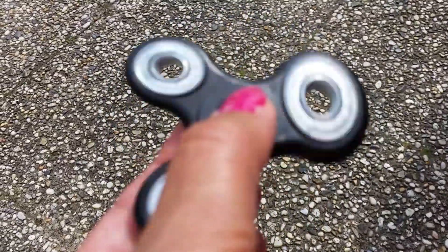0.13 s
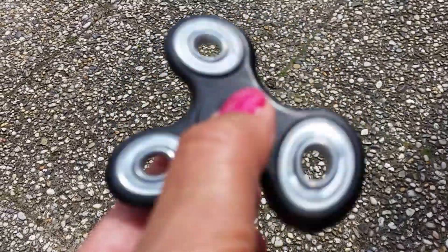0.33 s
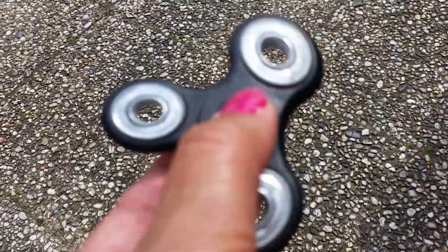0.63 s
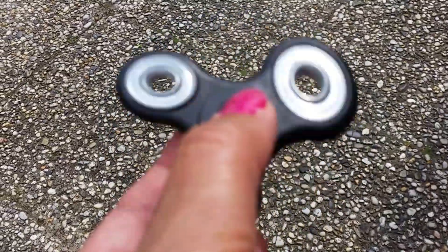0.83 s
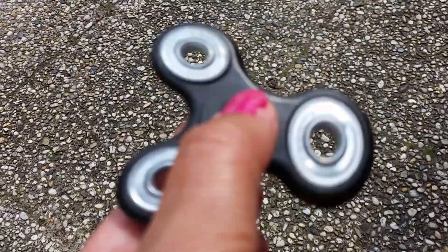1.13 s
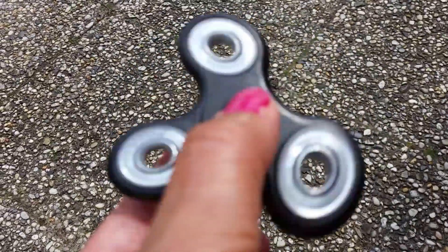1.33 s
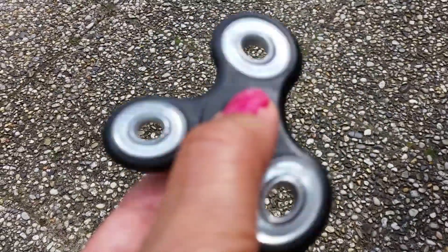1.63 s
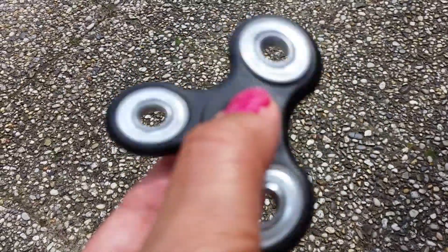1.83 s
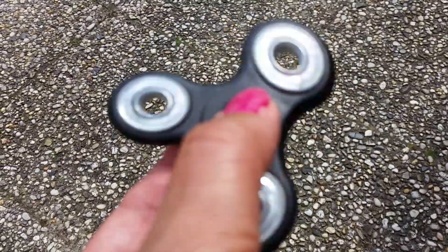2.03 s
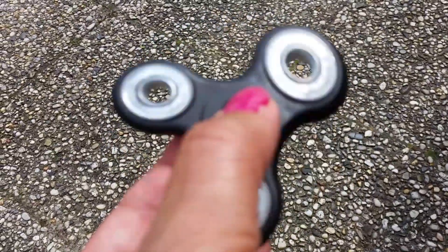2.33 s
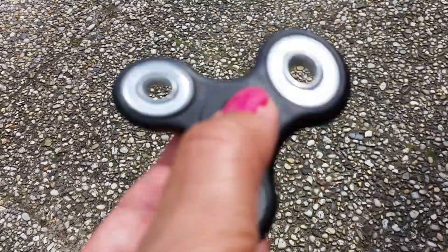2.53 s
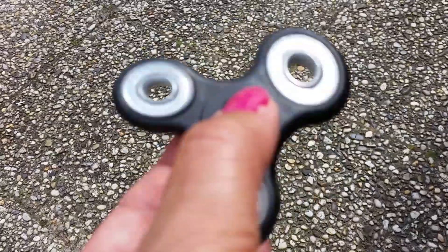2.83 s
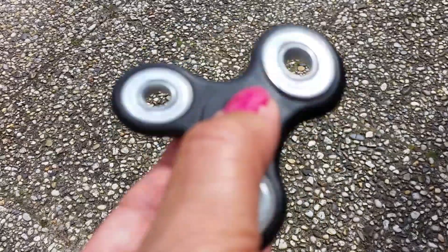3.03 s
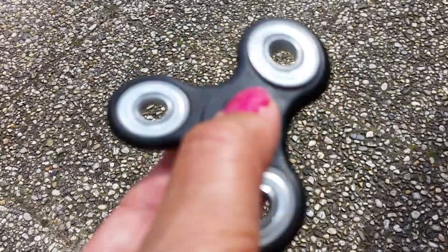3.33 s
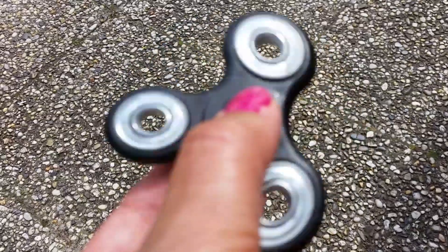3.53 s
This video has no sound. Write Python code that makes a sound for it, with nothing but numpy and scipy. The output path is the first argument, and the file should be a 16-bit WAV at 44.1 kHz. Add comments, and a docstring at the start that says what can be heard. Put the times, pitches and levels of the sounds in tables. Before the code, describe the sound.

A fidget spinner whirs throughout, thin and grainy, with light ticks near the start and at 1.7 seconds. Low machinery hum throbs over distant traffic rumble outdoors. A hand softly bumps the microphone three times between 1.4 and 1.7 seconds, then harder at 3.3. A fine hiss swells around 2.6 seconds, and a far bird chirps faintly at about 3.5.

```python
"""First you hear the narrow, grainy whir of a fidget spinner coasting between finger and thumb outdoors.
Tiny balls roll and rub in its bearing, making the metal ring and now and then tick.
The hand softly bumps the microphone a few times. Nearby machinery hums, its low tones beating
against each other under a thin motor buzz. Behind it all, distant traffic rumbles,
a fine hiss swells once, and a far bird chirps near the end."""
import sys
import numpy as np
from scipy import signal
from scipy.fft import rfft, irfft
from scipy.io import wavfile

SR = 44100
rng = np.random.default_rng(int(sys.argv[2]) if len(sys.argv) > 2 else 0)


def put_to_file(sound):
    """Save the sound as 16-bit audio at rate SR, in the file named by the first command-line argument."""
    columns = np.atleast_2d(sound).T  # one column per channel
    safe = np.clip(columns, -1, 1)
    whole_steps = np.round(safe * 32767)
    wavfile.write(sys.argv[1], SR, whole_steps.astype(np.int16))


N = 161847
T = np.arange(N) / SR
FREQS = np.maximum(np.arange(N // 2 + 1) * SR / N, 1)


CONTACTS_PER_S, CONTACT_SPREAD_DB, RUB_STRENGTH = 6000, 1.5, 0.89
WOBBLE_PER_S, WOBBLE_SWAY_HZ, LOAD_SWAY_HZ = 7.3, 21.5, 22
WHIR_DB, WHIR_BAND_HZ = -60.5, (2660, 4320)
# How the bearing rings: pitch_hz, width_hz, relative_level_db
BEARING_RINGS = [(3548, 404, 20), (3516, 80, 15)]
def bearing_whir():
    """Balls knock and rub, ringing the metal. The pitch sways as the toy wobbles and the load shifts."""
    sizes = from_db(CONTACT_SPREAD_DB * rng.exponential(1, (2, N))) * rng.choice([-1, 1], (2, N))
    contacts = rms_one(sizes * (rng.random((2, N)) < CONTACTS_PER_S / SR))
    force = contacts + RUB_STRENGTH * rng.standard_normal((2, N))
    whir = 0
    for hz, width, db in BEARING_RINGS:
        decay = np.exp(-np.pi * width / SR)  # a narrower ring lasts longer
        feedback = [1, -2 * decay * np.cos(2 * np.pi * hz / SR), decay ** 2]
        whir += from_db(db) * (1 - decay ** 2) * signal.lfilter([1, 0, -1], feedback, force)
    sway_hz = WOBBLE_SWAY_HZ * tone(WOBBLE_PER_S) + LOAD_SWAY_HZ * drift(5)
    # slide the whole whir up and down by sway_hz
    whir = np.real(signal.hilbert(whir) * np.exp(2j * np.pi * np.cumsum(sway_hz) / SR))
    return rms_one(band(whir, WHIR_BAND_HZ)) * from_db(WHIR_DB) * pan(16)


# Each tick: start_s, gain_db, pan_db (left minus right)
TICKS = [(.082, -64, -8), (.346, -51, -10), (1.684, -57, -10)]
# The tones in one tick: pitch_hz, gain_db, fade_s
TICK_RINGS = [(1700, -7, 0.0052), (2570, 0, 0.02), (3740, 4, .008), (5400, -10, 0.0055)]
def bearing_ticks():
    """A few ball contacts stand out as ticks. Each contact is soft, which dulls its treble."""
    ticks = sum(from_db(db) * pan(pan_db) * strike(s, TICK_RINGS) for s, db, pan_db in TICKS)
    return soften(ticks, corner_hz=4400)


# Each bump: start_s, gain_db
BUMPS = [(1.371, -31.5), (1.533, -36), (1.682, -34.5), (3.28, -24.5)]
# The tones in one bump: pitch_hz, gain_db, fade_s
BUMP_RINGS = [(140, -3.5, 0.011), (217, -6, 0.015), (436, -13, 0.01)]
def hand_bumps():
    """The hand knocks the microphone: short, round thuds with no deep bass or treble."""
    bumps = sum(from_db(db) * strike(s, BUMP_RINGS) for s, db in BUMPS)
    return band(bumps + 1e-18, edges_hz=(61, 470))


FAN_HZ, MAINS_HZ, DRONE_HZ = 119.2, 100.0, 218.55
FAN_TRIM_DB, MAINS_TRIM_DB, DRONE_TRIM_DB, FLUTTER_DB = -0.5, 1.5, -1, 0.5
# How each strong hum rises and falls, before its trim is added: time_s, level_db
FAN_LEVEL = [(0.0, -44), (0.6, -45), (0.8, -42), (1.05, -47.5), (1.2, -45), (1.57, -48.5), (1.72, -43),
             (1.9, -42), (2.2, -48), (2.54, -39), (2.87, -42), (3.15, -46.5), (3.4, -44.5), (3.67, -42)]
MAINS_LEVEL = [(0.0, -69), (0.35, -54), (0.8, -61), (1.08, -72), (1.34, -52), (1.84, -52.5), (2.2, -64),
               (2.38, -55.5), (2.9, -51.5), (3.3, -58), (3.67, -63)]
DRONE_LEVEL = [(0.0, -54.5), (0.59, -64.5), (1.02, -50.5), (1.72, -50), (2.1, -58.5), (3.67, -57.5)]
# Fainter hums: pitch_hz, level_db, pan_db, wander_hz
WEAK_TONES = [(31.2, -68.5, -2, 0.15), (50.16, -68, 7, 0.078), (61.4, -74.5, 21, 0.25),
              (198.8, -65, -4.5, 0.14), (248.2, -66.5, 5, 2.906), (335, -70, -1, 2.94),
              (463.6, -75.5, 2, 3.02)]
def machinery_hum():
    """A fan and the mains power hum at close pitches, so they beat (throb). Other tones join in."""
    hums = [(FAN_HZ, FAN_TRIM_DB, FAN_LEVEL), (MAINS_HZ, MAINS_TRIM_DB, MAINS_LEVEL),
            (DRONE_HZ, DRONE_TRIM_DB, DRONE_LEVEL)]
    strong = sum(from_db(trim_db + FLUTTER_DB * drift(10)) * level(curve) * tone(hz)
                 for hz, trim_db, curve in hums)
    weak = sum(from_db(db) * pan(pan_db) * tone(hz + wander_hz * drift(1.73))
               for hz, db, pan_db, wander_hz in WEAK_TONES)
    return strong * pan(-1.5) + weak


# Overtones of a second hum: pitch_multiple, level_db, pan_db
WAVER_TONES = [(2, -57.5, -2), (3, -63.5, -2)]
# How it fades and returns: time_s, gain_db
WAVER_GAIN = [(0, 1.5), (.8, -1), (1.2, -11.5), (1.8, -7.5), (2.16, -2), (2.7, -7.5), (2.95, 1.5),
              (3.67, 1.5)]
def wavering_hum(wander_hz=0.367):
    """A second hum wavers around two and three times the fan's pitch."""
    pitch = FAN_HZ + wander_hz * drift(2.2)
    hum = sum(from_db(db) * pan(pan_db) * tone(multiple * pitch) for multiple, db, pan_db in WAVER_TONES)
    return level(WAVER_GAIN) * hum


# Overtones of the motor: pitch_multiple, level_db, pan_db
MOTOR_TONES = [(6, -68.5, 9), (7, -81, -18), (9, -82, 10), (10, -82.5, 12), (15, -83.5, 26),
               (16, -80.5, 11), (17, -69.5, -17.5), (19, -75, 0.5), (23, -80, 10.5), (33, -85, 0),
               (30, -84.5, 14), (35, -91, -3), (37, -90, -23)]
def motor_buzz(base_hz=46.755, waver_db=0.76):
    """A motor buzzes thinly: faint tones at whole multiples of one low pitch."""
    return sum(from_db(db + waver_db * drift(3.2)) * pan(pan_db) * tone(multiple * base_hz)
               for multiple, db, pan_db in MOTOR_TONES)


# The low rumble and the tyre noise, from bass to treble: pitch_hz, level_db_per_hz
RUMBLE = [(15, -97), (35, -82), (70, -77), (125, -74), (150, -77), (180, -78), (260, -79), (340, -84),
          (480, -92), (900, -108), (2000, -135)]
TYRES = [(150, -105), (450, -91.5), (850, -88.5), (1300, -94), (2000, -99), (3300, -100), (4500, -106),
         (7000, -122), (9000, -132)]
# How each rises and falls: time_s, gain_db
RUMBLE_GAIN = [(0, 0), (.8, 1.5), (1.3, -1), (2.0, -0.5), (2.7, -2.5), (3.67, 0.5)]
TYRE_GAIN = [(0, -1), (.8, 1.5), (1.1, -3.5), (1.65, -3.5), (2.1, 0), (2.6, 1), (3.25, 1.5), (3.67, 2)]
def distant_traffic():
    """Far traffic makes a low rumble and a soft rush of tyres."""
    return level(RUMBLE_GAIN) * noise(RUMBLE) + level(TYRE_GAIN) * noise(TYRES)


SIZZLE_PEAK_S, SIZZLE_RISE_S, SIZZLE_FALL_S, SIZZLE_DB = 0.65, 0.02, 0.115, -71
# The steady hiss and the swelling hiss: pitch_hz, level_db_per_hz
STEADY_HISS = [(3000, -132), (8500, -129), (10500, -122), (11500, -116.5), (13500, -117), (15700, -113)]
SWELL_HISS = [(900, -108), (2000, -99), (3500, -93), (5500, -101), (7000, -110), (8700, -116),
              (11500, -108), (13500, -111), (15700, -109)]
# Which side the swelling hiss leans to: pitch_hz, pan_db
SWELL_PAN = [(1500, -14), (3500, 0.5), (5500, -10), (8000, -10.5), (11500, -1), (15000, -3)]
# How it rises and falls: time_s, gain_db
SWELL_GAIN = [(0, -10), (.5, -9.5), (.72, -8.5), (1.1, -11.5), (1.7, -12), (2.25, -9), (2.42, -4), (2.6, 0),
              (2.72, 0), (2.95, -2.3), (3.12, -7.5), (3.67, -9.5)]
def fine_hiss(flicker_db=1):
    """Over a faint, steady hiss come a short, very high sizzle and later one flickering swell."""
    steady = noise(STEADY_HISS)
    flicker = from_db(flicker_db * drift(34))
    swell = level(SWELL_GAIN) * flicker * noise(SWELL_HISS, over_hz(SWELL_PAN))
    from_peak_s = T - SIZZLE_PEAK_S
    burst = np.exp(-np.maximum(-from_peak_s / SIZZLE_RISE_S, from_peak_s / SIZZLE_FALL_S))
    sizzle = rms_one(band(rng.standard_normal((2, N)), edges_hz=(13800, 16000)))
    return steady + swell + from_db(SIZZLE_DB) * pan(-7) * burst * sizzle


# Each bird note: peak_s, pitch_hz, level_db, rise_and_fall_s
CHIRPS = [(3.442, 2450, -60.5, 0.012), (3.563, 1770, -67, .012), (3.6, 1800, -65.5, 0.015)]
def far_bird(sag_hz_per_s=201, rasp_hz=75, flutter_db=1.5):
    """Short, nearly level notes, made raspy by a fast flutter in pitch and strength."""
    notes = 0
    for peak_s, hz, db, slope_s in CHIRPS:
        sag_hz = sag_hz_per_s * np.clip(T - peak_s, -slope_s, slope_s)
        pitch = hz - sag_hz + rasp_hz * drift(146)
        shape = np.exp(-abs(T - peak_s) / slope_s)
        notes += from_db(db + flutter_db * drift(200)) * shape * tone(pitch)
    return notes * pan(-10)


# How alike the outdoor noise is on the left and right: pitch_hz, likeness_0_to_1
LIKENESS = [(60, 0.53), (240, 0.56), (480, 0.4), (950, 0)]
def noise(spectrum, pan_db=0):
    """Stereo noise shaped from bass to treble, alike on both sides only in the lows."""
    mid, side = rfft(rng.standard_normal((2, N)))
    alike = np.clip(over_hz(LIKENESS), 0, 1)
    both = np.sqrt(1 + alike) * mid + np.sqrt(1 - alike) * side * [[1], [-1]]
    return irfft(both * from_db(over_hz(spectrum)) * pan(pan_db), N) * np.sqrt(SR) / 2


def strike(start_s, rings):
    """A knock starts several tones at once; each dies away by 60 dB in its fade_s."""
    age = np.clip(T - start_s, 0, .5)
    return sum(from_db(db) * np.exp(-np.log(1000) * age / fade_s) * np.sin(2 * np.pi * hz * age)
               for hz, db, fade_s in rings)


def tone(hz):
    """A pure tone of strength 1 on a steady or moving pitch."""
    return np.sqrt(2) * np.sin(2 * np.pi * (np.cumsum(hz + np.zeros(N)) / SR + rng.random()))


def drift(rate_hz):
    """Random wandering of strength 1, mostly slower than rate_hz."""
    return rms_one(irfft(rfft(rng.standard_normal(N)) / (1 + (FREQS / rate_hz) ** 2), N))


def band(x, edges_hz):
    """Gently turn down what lies outside two pitches."""
    return signal.sosfilt(signal.butter(2, edges_hz, "band", fs=SR, output="sos"), x)


def soften(x, corner_hz):
    """Dull the treble above corner_hz."""
    return signal.sosfilt(signal.butter(2, corner_hz, fs=SR, output="sos"), x + 1e-18)


def from_db(db):
    """Turn decibels into a multiplier."""
    return 10 ** (np.asarray(db) / 20)


def rms_one(x):
    """Scale to an average strength (rms) of 1."""
    return x / np.sqrt(np.mean(x ** 2) + 1e-20)


def level(rows):
    """Join (time_s, level_db) points into a multiplier over time."""
    return from_db(np.interp(T, *np.transpose(rows)))


def over_hz(points):
    """Join (pitch_hz, value) points, giving each octave equal room."""
    hz, value = np.transpose(points)
    return np.interp(np.log(FREQS), np.log(hz), value)


def pan(db):
    """Left and right multipliers; positive db leans left."""
    return from_db(np.array([[.5], [-.5]]) * db)


def scene():
    """Add up all the sounds at the microphone."""
    spinner = bearing_whir() + bearing_ticks()
    machinery = machinery_hum() + wavering_hum() + motor_buzz()
    return spinner + hand_bumps() + machinery + distant_traffic() + fine_hiss() + far_bird()


def record(dry):
    """Cut off the very highest treble steeply."""
    cutoff_hz = 15750
    hz = np.arange(N + 1) * SR / (2 * N)
    return irfft(rfft(dry, 2 * N) / np.sqrt(1 + (hz / cutoff_hz) ** 1200))[:, :N]


dry = scene()
out = record(dry)
put_to_file(out)
```